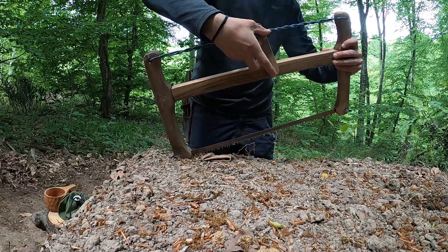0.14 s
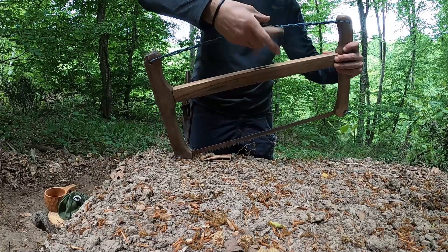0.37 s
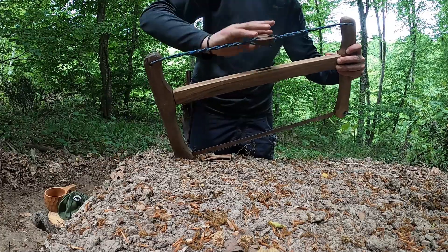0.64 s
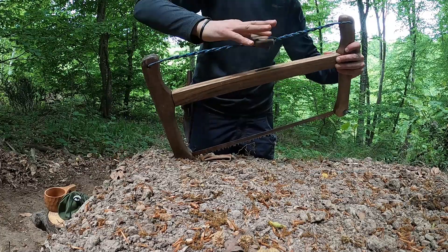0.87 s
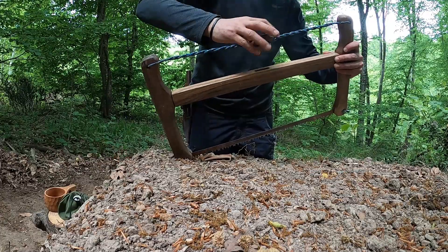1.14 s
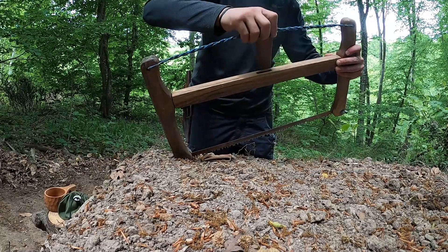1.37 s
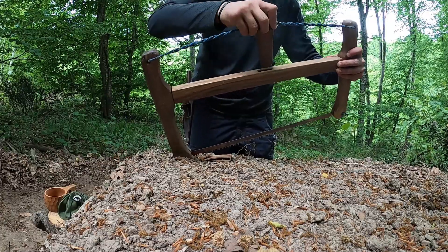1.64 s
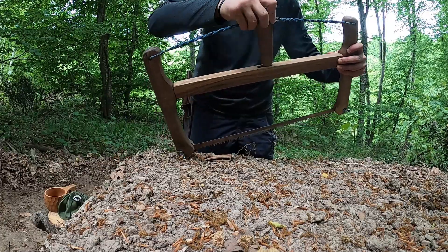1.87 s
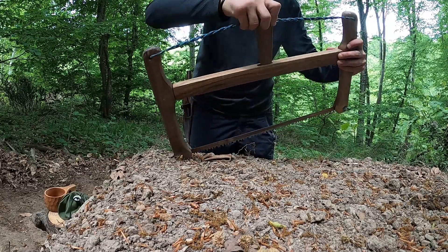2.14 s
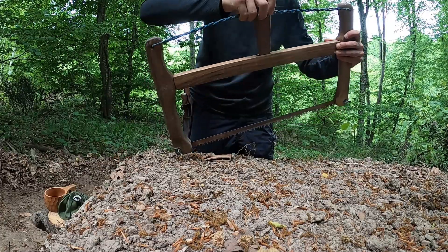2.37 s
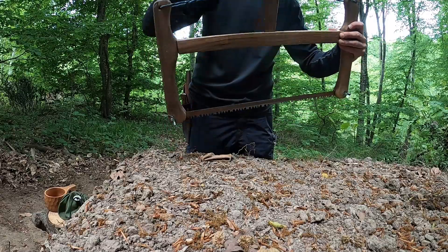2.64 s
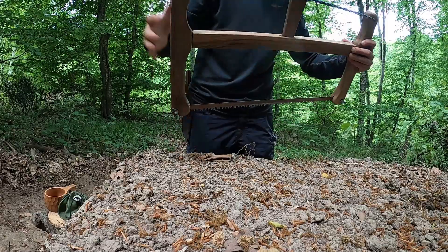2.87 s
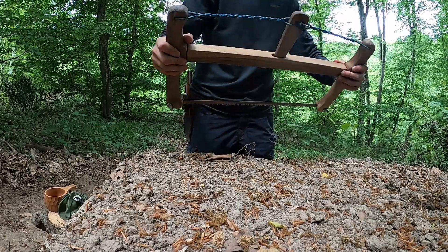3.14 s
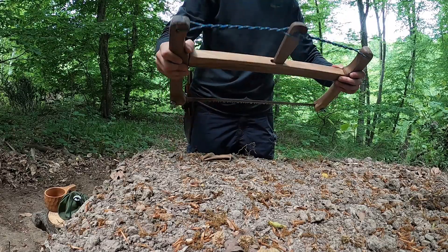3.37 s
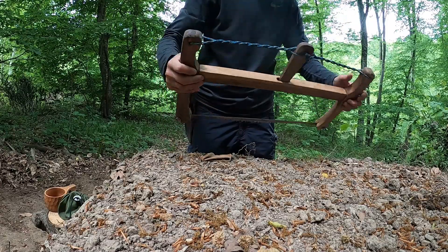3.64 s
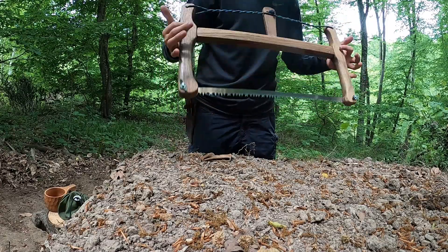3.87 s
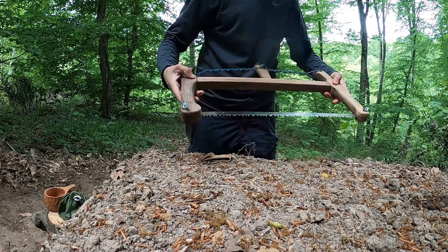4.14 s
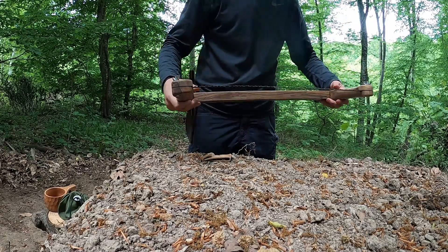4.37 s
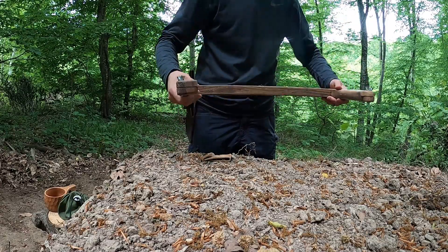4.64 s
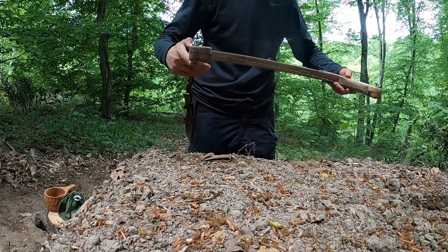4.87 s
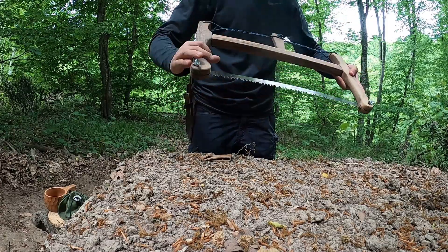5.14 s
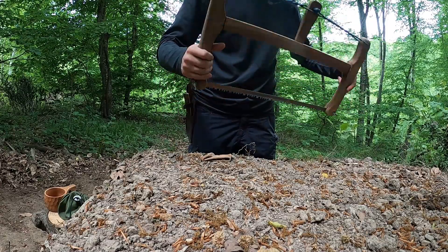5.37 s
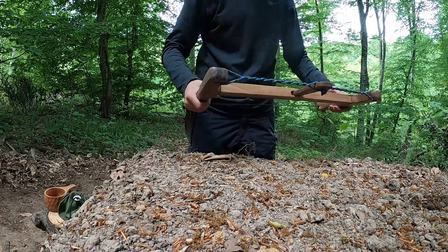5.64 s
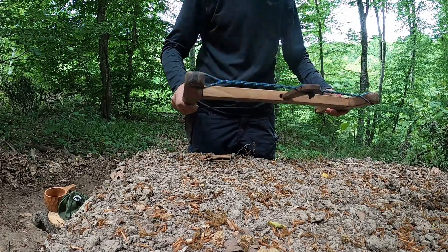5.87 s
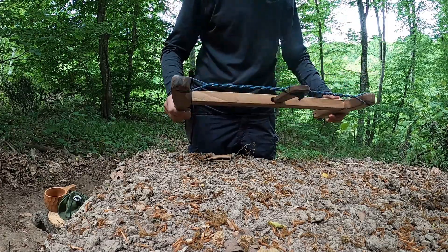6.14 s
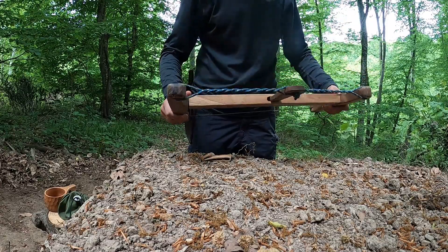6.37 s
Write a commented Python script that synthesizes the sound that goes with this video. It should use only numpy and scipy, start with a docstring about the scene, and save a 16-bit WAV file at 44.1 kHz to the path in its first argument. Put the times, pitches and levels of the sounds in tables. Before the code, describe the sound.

Close, dry clicks of a wooden saw frame being tightened: a few small ticks, one hard snap, then a solid knock and faint cord creaks. Another click, then clusters of woody rattling as the saw is turned in the hands, with soft skin and sleeve rubbing. After a calmer spell a loose rattle returns and dies away. A fluting bird and later a thin high one sing to the left, over faint leaf hiss and low rumble. Close stereo microphone outdoors.

```python
"""A wooden frame saw is tightened and turned over in the hands, in a wood.
Toggle, cord and joints click and knock: short noise bursts and blows ring resonances of the wood.
Hands and sleeves rub on the frame and the cord creaks: grainy noise through resonances.
Two birds sing swelling sines with echoes from the trees, over filtered noise:
a low far rumble, the hiss of leaves and wind on the microphone."""
import sys
import numpy as np
from scipy import signal
from scipy.fft import rfft, irfft
from scipy.io import wavfile

SR = 44100
rng = np.random.default_rng(int(sys.argv[2]) if len(sys.argv) > 2 else 0)


def volts(x):
    """Linear amplitude factor 10**(x/20) for a level x in dB, scalar or array-like."""
    e = np.asarray(x, float) / 20
    return 10 ** e


def transcribe(u):
    """Save the signal u as a 16-bit wav file named by the first command-line argument.

    u: samples, shape (n,) or (channels, n), limited to [-1, 1]; the rate is SR.
    q: integer samples, one column per channel.
    """
    v = np.clip(np.atleast_2d(u).T, -1, 1)
    q = np.round(v * 32767).astype(np.int16)
    wavfile.write(sys.argv[1], SR, q)


N = 286650

# clicks of toggle, cord and joints, before filtering:
# (time [s], stick peak [dB], stick ring [Hz], hollow part [dB re stick], bright part [dB re stick])
CLICKS = [(0.0974, -34.5, 3000, 1.5, 4), (0.1011, -24, 3350, -21, -35), (0.1135, -37.5, 3140, -10, -12),
          (0.4233, -28, 1800, -31, 0), (0.435, -25, 3070, -15.5, -17), (0.5033, -39.5, 2760, -24, -13),
          (0.546, -48.5, 3200, -8, -10), (0.704, -23, 3290, -10, -36), (0.7697, -30.5, 3570, -5.5, -20),
          (0.7742, -26, 2880, -28, -36), (0.796, -24.5, 3330, -35, -35), (0.8019, -24, 4750, -19, -15),
          (1.419, -31, 2330, -11, -15), (1.4251, -31.5, 3010, -10, -21), (1.4363, -0.5, 3064, -42, -43),
          (1.5382, -37, 2520, -17, -27), (1.7103, -40, 3380, -19, -32.5), (1.738, -37, 3280, -14, -10),
          (1.7541, -41.5, 2250, -5.5, -31), (1.819, -42.5, 3290, -19, -25),
          (1.9362, -27.5, 2950, -1.5, -7.5), (1.9443, -5, 2490, -5.5, -41),
          (2.1263, -37.5, 2670, -7.5, -27.5), (2.202, -33.5, 5360, -6.5, -32),
          (2.2185, -38, 3300, -3.5, -35), (2.271, -32.5, 1880, -7, -36), (2.3284, -30, 2540, -11.5, -39.5),
          (2.3969, -34, 2700, -17, -20.5), (2.4089, -30.5, 3440, -4, -27), (2.422, -34.5, 3180, -9, -18),
          (2.4883, -27, 2310, -22, -33.5), (2.5251, -21.5, 2720, -17, -33.5),
          (2.5587, -47, 2610, -4, -30.5), (2.6, -21, 3056, -6, -3), (2.9828, -29.5, 1800, -2.5, -0.5),
          (2.9874, -19.5, 5580, -5, -12), (3.0873, -15, 2950, -27, -30), (3.091, -20.5, 2900, -32, -30),
          (3.0984, -17, 3600, -32, 3), (3.109, -19, 2730, -10, -13), (3.1545, -42, 2840, 3, -20),
          (3.1727, -31.5, 2300, -11.5, -40), (3.2689, -14.5, 3010, -12, -37),
          (3.284, -16.5, 3430, -9.5, -25), (3.3145, -39.5, 2940, 8.5, -21), (3.329, -31.5, 2820, -4, -26.5),
          (3.334, -21, 3040, -5.5, -22), (3.3362, -15.5, 3190, -10, -24.5), (3.427, -50.5, 2000, -3, -40),
          (3.465, -54, 2400, -1, -40.5), (3.5602, -14, 2890, -6, 2.5), (3.565, -11.5, 3130, -12, -17),
          (3.5704, -24.5, 3270, -5, -20), (3.5861, -9.5, 3230, -30, -23), (3.6042, -37.5, 2690, -10, -16),
          (3.6745, -20.5, 3780, -6.5, -22), (3.6791, -16, 3020, -15.5, -46), (4.1206, -25, 3070, -8, -6),
          (4.5908, -27, 2090, -5, -47), (4.6185, -22, 3390, -24, 0), (4.645, -34, 2940, -7, -30),
          (4.6925, -33.5, 2820, -5, -38), (4.8008, -49, 2100, 6.5, -34), (4.833, -51, 2100, 3.5, -30),
          (4.865, -55, 2100, 3.5, -28), (4.9488, -33.5, 2730, -15, -19.5), (5.0828, -29, 2970, -22, -20),
          (5.207, -31, 3400, -8, -0.5), (5.23, -26.5, 2530, -7.5, -17), (5.248, -24.5, 3620, -8, -3),
          (5.2541, -19, 2740, -30, -33), (5.2623, -30, 3820, -9.5, -19.5), (5.289, -26.5, 4390, -13, -4),
          (5.304, -31, 2700, -9, -19.5), (5.3242, -25.5, 4350, -12, -34), (5.3348, -25, 2650, -12, -30),
          (5.3675, -14, 5100, -20, -44), (5.374, -17, 4470, -11.5, -39), (5.3966, -24.5, 2140, -7, -32),
          (5.4107, -30.5, 4300, -18, -22), (5.452, -35, 4170, -5, -28), (5.5149, -22.5, 1870, -3.5, -35.5),
          (5.5241, -24, 3140, -9, -26.5), (5.5523, -29, 4300, -6, -21.5), (5.5566, -27, 2720, -4, -35),
          (5.6456, -26, 2600, -5.5, -30), (6.3476, -42, 2280, -2.5, -26.5)]
# a weak click drags: its t60 at the middle level, and how it shortens as the level rises
CLICK_T60_MS, MIDDLE_CLICK_DB, SHORTENING_PER_DB = 22, -24, 0.0278
HOLLOW_HZ, HOLLOW_WIDTH_HZ = 1280, 250
GROUND_DELAY_S, GROUND_DB = .0017, -15.5
# rings of the sticks: (frequency [Hz], gain [dB], t60 after a click [s])
STICK_MODES = [(1900, -4, .03), (2230, -1, .04), (2770, 0, .03), (3050, 0, .025), (3400, -1, .03),
               (4350, -6, .025), (5600, -8, .025)]
# slow rings of the crossbar: (frequency [Hz], gain [dB], t60 [s])
CROSSBAR_MODES = [(1157, -3.5, 0.05), (1315, 5, 0.034)]

# knocks that move the whole frame: (time [s], strength [dB])
KNOCKS = [(.1, -57.5), (.425, -60.5), (.506, -56), (1.436, -47), (1.943, -36.5), (2.983, -46.5),
          (3.088, -59.5), (3.269, -54.5), (3.335, -52), (3.561, -47), (3.677, -54.5), (4.122, -55.5),
          (5.254, -53.5), (5.367, -61), (5.515, -55)]
# rings of the frame: (frequency [Hz], gain [dB re strength], t60 [s])
FRAME_MODES = [(110, -9, 0.023), (228, -0.5, 0.049), (350, 2, 0.051), (567, 2.5, .02)]
# longer rings of the taut cord and blade after a blow: (time [s], level [dB], frequency [Hz], t60 [s])
TWANGS = [(1.945, -59, 431, 1), (1.945, -53.5, 990, 0.34), (1.945, -51, 2130, 0.27),
          (2.271, -48, 1450, 0.15), (5.335, -40, 1800, 0.13), (5.326, -48, 1040, 0.28),
          (5.397, -52, 1050, 0.25), (5.453, -51.5, 1300, 0.46), (3.11, -46.5, 1200, 0.19)]

# strokes of hand or sleeve on the frame:
# (time of top [s], length [s], top level [dB], hollow part [dB re level], bright part [dB re level])
STROKES = [(0.004, 0.041, -52.5, 0.5, -6), (0.124, 0.18, -62, -1.5, -7.5), (0.245, 0.097, -68, -4, 0.5),
           (0.426, 0.058, -41.5, -12, -11), (0.565, 0.061, -78, 8, -1), (0.647, 0.27, -65, -7, 3.5),
           (.795, 0.033, -47, 0, -17), (0.915, 0.6, -72, -1, -6.5), (1.196, 0.11, -76, -5, 10),
           (1.351, 0.075, -58.5, -26, -8), (1.437, 0.17, -64.5, 3, -15), (1.545, 0.064, -56.5, -8, -16.5),
           (1.621, .13, -58, -28, -17.5), (1.743, 0.079, -65, 8, -15), (1.833, .14, -65, -14, -14),
           (1.937, 0.062, -66, 18.5, -6.5), (2.02, 0.18, -56.5, -8, -12), (2.241, .16, -61.5, -8, -8),
           (2.412, 0.037, -41.5, -13.5, -16), (2.605, 0.089, -60, 6, 1), (2.999, 0.068, -63, 11, 7.5),
           (3.051, .14, -54, -15.5, 0), (3.115, 0.069, -45.5, 2.5, -8), (3.319, 0.12, -67, 9, 9.5),
           (3.582, 0.088, -62, 14, -16.5), (3.657, 0.18, -54.5, -17, -12), (3.743, 0.065, -57.5, -7, -10),
           (3.931, 0.35, -60.5, -21.5, 1.5), (4.119, 0.056, -50, -21.5, 0), (4.27, 0.47, -69.5, -1.5, 8),
           (4.473, .09, -80.5, 9, 18.5), (4.626, 0.12, -64, 3, -13), (4.966, 0.39, -73, 0.5, 8.5),
           (5.203, .07, -55.5, -8.5, -2), (5.287, 0.19, -49, 4.5, 1.5), (5.341, 0.17, -50, -3.5, -15),
           (5.402, .16, -49, -3, -25), (5.477, 0.091, -57, 2, -21), (5.534, 0.072, -62.5, 15.5, -15),
           (5.639, 0.28, -63.5, -11, -9.5), (5.883, .09, -85, 11, 29.5), (6.098, 0.18, -83, -7, -13),
           (6.36, 0.27, -70.5, -2.5, 4.5)]
STROKE_FADE_DB, RISE_SHARE = 19, 0.46   # fall from the top to either end; share of the length spent rising
# relative spectrum of the rubbing: (frequency [Hz], density [dB per Hz])
RUB_COLOUR = [(410, -38.5), (700, -13), (958, -15), (1330, -10.5), (1540, -8.5), (2300, -6), (2920, -5.5),
              (3320, -5), (4490, -5.5), (5610, -11.5), (6920, -7), (7890, -14), (9480, -27.5), (12500, -28),
              (16000, -40)]
TICKS_PER_S, TICK_DB = 60, 2   # ticks of the joints; strength re the stroke

# creaking of the twisted cord: (time [s], level [dB])
CREAK = [(1.57, -73), (1.62, -64.5), (1.69, -74), (1.72, -52), (1.77, -71.5), (1.82, -65), (1.85, -75),
         (1.93, -63)]
# resonances of the cord: (frequency [Hz], width [Hz], gain [dB])
CORD_MODES = [(1370, 26, -8.5), (2260, 150, -15), (3380, 43, 1), (5600, 360, 2), (7890, 200, -12)]
# soft scuffs of a finger or the toggle: (middle time [s], level [dB], centre [Hz], span, 0.84 of it sounding [s])
SCUFFS = [(0.243, -60, 3400, 0.038), (0.952, -58.5, 2780, 0.055), (1.194, -62, 2800, 0.17),
          (1.284, -71, 2740, 0.023), (3.455, -57.5, 1490, 0.16), (1.618, -58, 3400, .12),
          (3.91, -61.5, 3440, 0.24), (4.482, -69.5, 4500, 0.092), (5.875, -70.5, 3400, 0.065)]

# gain of the saw in the left port re the right: (frequency [Hz], gain [dB])
LEFT_SHADOW = [(100, -1.2), (800, -2.2), (2500, -.3), (5500, -.6), (7000, -7), (8500, -7), (12000, -13)]
# lag of the saw in the left port: (frequency [Hz], phase lag [rad])
LEFT_LAG = [(1, 0), (700, .2), (1500, .42), (3000, .85), (6000, 1.6), (7000, 2.6), (8200, 1.2),
            (16000, 1.8)]

# fluting bird, a row a note, before panning: (level [dB], pitch line of (time [s], frequency [Hz]))
FLUTE = [(-57.5, [(0, 2287), (.1, 2276)]), (-70, [(.17, 1334), (.21, 1457), (.245, 1690), (.26, 1690)]),
         (-62, [(.255, 2260), (.27, 2404), (.335, 2145), (.36, 2150), (.41, 1610)]), (-62.5, [(.315, 2640),
         (.34, 2610)]), (-58.5, [(.33, 2286), (.415, 2280)]), (-61.5, [(.385, 2830), (.455, 2690)]),
         (-67, [(.43, 1532), (.48, 1666), (.56, 1600)]), (-65.5, [(.62, 2720), (.7, 2670)]),
         (-72.5, [(.96, 2573), (1.08, 2517)]), (-61.5, [(4.325, 1572), (4.35, 1720), (4.45, 1776),
         (4.5, 1716), (4.55, 1780)]), (-49, [(4.6, 2050), (4.64, 2038), (4.685, 2173), (4.7, 2130)]),
         (-49.5, [(4.7, 2474), (4.725, 2598), (4.75, 2354), (4.8, 2240), (4.87, 2260)]),
         (-56.5, [(4.92, 2140), (4.95, 2080)]), (-55, [(4.955, 3280), (5.03, 3384), (5.04, 3890),
         (5.06, 3900)]), (-46.5, [(5.035, 2640), (5.045, 2897), (5.09, 2563), (5.14, 2573), (5.19, 2650),
         (5.22, 2580)])]
# thin high bird, a row a note, before panning: (level [dB], pitch line of (time [s], frequency [Hz]))
THIN = [(-56, [(5.617, 5600), (5.635, 6865), (5.652, 7260), (5.672, 7180), (5.7, 5760)]),
        (-68, [(5.9, 6270), (5.932, 7450), (5.985, 7190), (5.992, 6600)]), (-67, [(6.035, 3850),
        (6.065, 4580), (6.088, 6640), (6.125, 7000)]), (-73.5, [(6.225, 4100), (6.25, 4397), (6.32, 4350)])]
# one falling note of the thin bird's trill: (time from note start [s], frequency [Hz])
TRILL_LINE = [(0, 6880), (.008, 5470), (0.017, 4500), (0.022, 4410)]
TRILL_DB, TRILL_START_S, TRILL_STEP_S, TRILL_NOTES = -64, 5.712, .0365, 5
NOTE_RISE, NOTE_FALL = 0.18, 0.22   # shares of a note's length
TREES_T60_S = 0.88

# relative spectrum of rumble and leaves: (frequency [Hz], density [dB per Hz])
WOOD_COLOUR = [(20, -17.5), (55, -14.5), (110, -18.5), (165, 0), (225, -1.5), (290, -5.5), (400, -6),
               (570, -15), (780, -23), (1050, -15.5), (2500, -17.5), (7700, -22), (8900, -36.5),
               (16000, -56.5)]
WOOD_DB = -67   # mean of the two sides
# likeness of left and right: (frequency [Hz], correlation [0 to 1])
LIKENESS = [(60, 0.39), (600, 0.62), (1400, 0.1), (3000, .1), (7000, 0.012)]
# wind on the microphone, before its random swells: (time [s], level [dB])
BREEZE = [(0.0, -87), (0.03, -79.5), (1.83, -80.5), (2.39, -97), (3.04, -82), (3.08, -88), (4.96, -85.5),
          (5.36, -75), (5.47, -87), (6.5, -92)]


def clicks():
    """Each slip is a snap and a dying scratch that ring the stick, the hollow of the frame and the bright edge."""
    out, t_s = np.zeros(N + 3000), np.arange(3000) / SR
    scratches = rng.standard_normal((len(CLICKS), len(t_s)))
    for (s, db, hz, hollow_db, bright_db), scratch in zip(CLICKS, scratches):
        t60_ms = CLICK_T60_MS * np.exp(-SHORTENING_PER_DB * (db - MIDDLE_CLICK_DB))
        faint_tail = volts(-38.0 - 60 * t_s / 0.027)
        dying = volts(-60000 * t_s / max(t60_ms, 2)) + faint_tail
        scratchy = min(t60_ms / 22, 1)   # a short slip is nearly all snap
        snap = 5.1 * (t_s == t_s[8])
        push = scratchy * scratch * dying * np.minimum(t_s / 0.00013, 1) + snap
        stick = resonance(resonance(push, hz, 800), hz, 1300)
        stick = stick + .14 * cut(push, "band", [1600, 5500])
        hollow = resonance(push, HOLLOW_HZ, HOLLOW_WIDTH_HZ)
        bright = cut(push, "band", [5600, 9500])
        start = round(s * SR) - 12
        for part, part_db in [(stick, 0), (hollow, hollow_db), (bright, bright_db)]:
            out[start:start + len(t_s)] += volts(db + part_db) * part / np.abs(part).max()
    out = cut(cut(out[:N], "low", 9000), "high", 850, order=3)
    # the mound below throws each click back
    out = out + volts(GROUND_DB) * np.roll(out, round(GROUND_DELAY_S * SR))
    hollow_blows = [(s, db + hollow_db) for s, db, hz, hollow_db, bright_db in CLICKS]
    sticks = struck(CLICKS, STICK_MODES, coupling_db=-32, spread_db=3)
    crossbar = struck(hollow_blows, CROSSBAR_MODES, coupling_db=-23, spread_db=2.5)
    return out + sticks + crossbar


def knocks():
    """Heavier blows ring the modes of the whole frame; a few leave cord or blade ringing."""
    out = cut(struck(KNOCKS, FRAME_MODES, coupling_db=0, spread_db=2), "high", 100)
    for s, db, hz, t60_s in TWANGS:
        blow = volts(db) * (np.arange(N) == round(s * SR))
        out = out + ring(blow, hz, t60_s)
    return out


def struck(events, modes, coupling_db, spread_db):
    """Every blow strikes all modes, each with a strength and sign of its own."""
    rows, out = np.array(events), np.zeros(N)
    places = np.round(rows[:, 0] * SR).astype(int)
    chance = rng.normal(0, 1, (len(rows), len(modes)))
    signs = rng.choice([-1, 1], chance.shape)
    for k, (hz, db, t60_s) in enumerate(modes):
        blows = np.zeros(N)
        strength_db = rows[:, 1] + db + coupling_db + spread_db * chance[:, k]
        blows[places] = signs[:, k] * volts(strength_db)
        out += ring(blows, hz, t60_s)
    return out


def ring(blows, hz, t60_s):
    """A unit blow sets a dying sine of initial height 1 ringing."""
    r, w = volts(-60 / (t60_s * SR)), 2 * np.pi * hz / SR
    return signal.lfilter([0, np.sin(w)], [1, -2 * r * np.cos(w), r * r], blows + 1e-18)


def rubbing():
    """Skin and cloth on wood: one grainy friction, heard low, middle and bright; the joints tick under it."""
    middle_gain, hollow_gain, bright_gain = strokes()
    friction = grains(share=0.0087, size_db=2.0, clump_db=3.5)
    cord = sum(1.2 * volts(db) * resonance(friction, hz, width_hz) for hz, width_hz, db in CORD_MODES)
    friction = friction + cord
    middle = rms_one(coloured(friction, RUB_COLOUR, 1700, 6800))
    hollow = rms_one(coloured(friction, RUB_COLOUR, 900, 1700))
    bright = rms_one(coloured(friction, RUB_COLOUR, 6800))
    out = middle_gain * volts(1.5 * drift(12)) * middle
    out += hollow_gain * volts(1.5 * drift(20)) * hollow
    out += bright_gain * volts(1.5 * drift(20)) * bright
    ticking = rng.random(N) < TICKS_PER_S / SR
    ticks = ticking * rng.standard_normal(N) * middle_gain * volts(TICK_DB)
    # ticks die three times faster than clicks
    rung = sum(volts(db) * ring(ticks, hz, t60_s / 3) for hz, db, t60_s in STICK_MODES)
    return out + cut(rung, "high", 900, order=3)


def strokes():
    """Gain of the middle, hollow and bright friction: each stroke swells and fades in dB."""
    t_s, gains = np.arange(0, N, 32) / SR, 0
    for s, length_s, db, hollow_db, bright_db in STROKES:
        away = np.maximum((s - t_s) / RISE_SHARE, (t_s - s) / (1 - RISE_SHARE)) / max(length_s, .02)
        tops_db = np.array([[db], [db + hollow_db], [db + bright_db]])
        gains = gains + volts(tops_db - STROKE_FADE_DB * np.minimum(away, 4))
    return [np.interp(np.arange(N) / SR, t_s, gain) for gain in gains]


def grains(share, size_db, clump_db):
    """A hiss in which a share of the samples stand out as grains, in clumps."""
    grain_db = size_db * np.minimum(rng.exponential(1, N), 4)
    sizes = volts(grain_db * (rng.random(N) < share))
    return rng.standard_normal(N) * sizes * volts(clump_db * drift(40.2))


def creak():
    """Uneven slips of the strands ring the narrow resonances of the cord."""
    slips = grains(share=0.0075, size_db=10.0, clump_db=2)
    t_s = np.arange(N) / SR
    sounding = (t_s > CREAK[0][0]) & (t_s < CREAK[-1][0])
    rung = sum(volts(db) * rms_one(resonance(slips, hz, width_hz)) for hz, width_hz, db in CORD_MODES)
    return volts(in_time(CREAK)[0]) * sounding * rung


def scuffs():
    """Brief swells of friction around one pitch."""
    friction, out = grains(share=0.012, size_db=9.0, clump_db=0.0), np.zeros(N)
    for s, db, hz, span_s in SCUFFS:
        swell = np.hanning(round(0.84 * span_s * SR))
        start = round(s * SR) - len(swell) // 2
        stop = start + len(swell)
        piece = resonance(resonance(friction[start:stop], hz, 520), hz, 480)
        out[start:stop] += volts(db) * swell * rms_one(piece)
    return out


def near(x):
    """The saw reaches the left port later, and its treble is shadowed there."""
    hz = np.fft.rfftfreq(N, 1 / SR)
    lag = np.exp(-1j * at_hz(LEFT_LAG, hz))
    left = irfft(rfft(x) * volts(at_hz(LEFT_SHADOW, hz)) * lag, N)
    return np.array([left, x])


def song(notes, flutter_db):
    """Whistled notes: a sine on the pitch line swells and fades, unsteady in level, with a weak octave."""
    out = np.zeros(N)
    flutter = volts(flutter_db * drift(60))
    for db, line in notes:
        s, hz = np.transpose(line)
        span = np.arange(round(s[0] * SR), round(s[-1] * SR))
        phase = 2 * np.pi * np.cumsum(np.interp(span / SR, s, hz)) / SR
        along = np.linspace(0, 1, len(span))
        edges = np.clip(np.minimum(along / NOTE_RISE, (1 - along) / NOTE_FALL), 0, 1)
        whistle = np.sin(phase) + 0.017 * np.sin(2 * phase)
        out[span] += np.sqrt(2) * volts(db) * edges * whistle
    return out * flutter


def trees(x):
    """Scattered echoes from the trunks: a dying noise tail, another one for each side."""
    t_s = np.arange(SR) / SR
    tail = rng.standard_normal((2, SR)) * volts(-60 * t_s / TREES_T60_S) * np.minimum(t_s / 0.031, 1)
    tail = cut(tail, "band", [500, 8000])
    tail = tail / np.sqrt(np.sum(tail ** 2, axis=1, keepdims=True))
    return signal.fftconvolve(x[None], tail, axes=1)[:, :N]


def background():
    """Far rumble and leaf hiss as noise, least alike in both sides in the treble; lumpy wind below."""
    mid, side = rfft(rng.standard_normal((2, N)))
    alike = np.clip(at_hz(LIKENESS, np.fft.rfftfreq(N, 1 / SR)), 0, 1)
    white = irfft(np.sqrt(1 + alike) * mid + np.sqrt(1 - alike) * side * [[1], [-1]], N)
    rumble = coloured(white, WOOD_COLOUR, 1, 700) * volts(1.5 * drift(2.5))
    leaves = coloured(white, WOOD_COLOUR, 700) * volts(drift(1.5))
    wind = rng.standard_normal(N) + .5 * rng.standard_normal((2, N))   # shared part and each side's own
    wind = rms_one(cut(wind, "band", [15, 45])) * volts(in_time(BREEZE)[0] + 3 * drift(7.0))
    return volts(WOOD_DB) * rms_one(rumble + leaves) * volts([[.1], [-.1]]) + wind


def in_time(rows):
    """Columns of a curve, one value a sample."""
    s, *columns = np.transpose(rows)
    return [np.interp(np.arange(N) / SR, s, column) for column in columns]


def at_hz(points, hz):
    """Value of a spectrum at hz, interpolated over log frequency."""
    point_hz, values = np.array(points).T
    return np.interp(np.log(hz + 1), np.log(point_hz), values)


def rms_one(x):
    """Scale to rms 1."""
    return x / np.sqrt(np.mean(x ** 2) + 1e-20)


def drift(rate_hz):
    """Slow chance of spread 1: smoothed noise, drawn every 40 samples."""
    r = np.exp(-80 * np.pi * rate_hz / SR)
    noise = rng.standard_normal(N // 40 + 2002)
    slow = signal.lfilter([1], [1, -2 * r, r * r], noise)[2000:]
    return np.interp(np.arange(N) / 40, np.arange(len(slow)), rms_one(slow))


def resonance(x, hz, width_hz):
    """Two-pole resonance with gain 1 on top."""
    r = np.exp(-np.pi * width_hz / SR)
    poles = [1, -2 * r * np.cos(2 * np.pi * hz / SR), r * r]
    return signal.lfilter([(1 - r * r) / 2, 0, (r * r - 1) / 2], poles, x)


def cut(x, kind, hz, order=2):
    """Butterworth filter."""
    return signal.sosfilt(signal.butter(order, hz, kind, fs=SR, output="sos"), x)


def coloured(x, spectrum, low_hz=1, high_hz=SR):
    """Noise given a spectrum, kept between two soft edges."""
    hz = np.fft.rfftfreq(N, 1 / SR) + 1
    between = 1 / np.sqrt((1 + (low_hz / hz) ** 6) * (1 + (hz / high_hz) ** 6))
    return irfft(rfft(x) * volts(at_hz(spectrum, hz)) * between, N)


def scene():
    """Saw close in front, birds off to the left, echoes of both, background."""
    saw = clicks() + knocks()
    flute = song(FLUTE, flutter_db=2.2)
    trill = []
    for k in range(TRILL_NOTES):
        start_s = TRILL_START_S + k * TRILL_STEP_S
        trill.append((TRILL_DB, [(s + start_s, hz) for s, hz in TRILL_LINE]))
    thin = song(THIN + trill, flutter_db=2.5)
    birds = flute * volts([[2.5], [-4]]) + thin * volts([[1.5], [-2.5]])   # left, right
    echoes = trees(volts(-37.5) * saw + volts(-5.0) * flute + volts(-5.0) * thin)
    return near(saw + rubbing() + creak() + scuffs()) + birds + echoes + background()


def band_limit(x):
    """A steep low-pass at the top of the band."""
    return signal.sosfilt(signal.butter(12, 16490, fs=SR, output="sos"), x)


def record(dry):
    """A steep low-pass takes off the top, 50 dB down from 16.2 kHz."""
    top = signal.cheby2(10, 50, 16200, fs=SR, output="sos")
    return band_limit(signal.sosfilt(top, dry))


dry = scene()
out = record(dry)
transcribe(out)
```